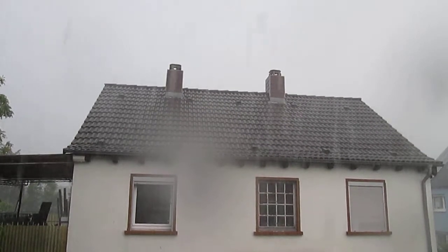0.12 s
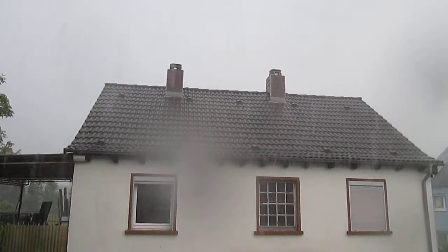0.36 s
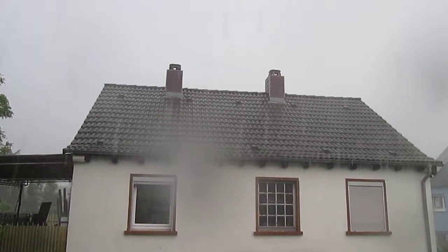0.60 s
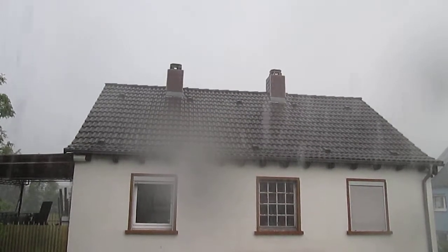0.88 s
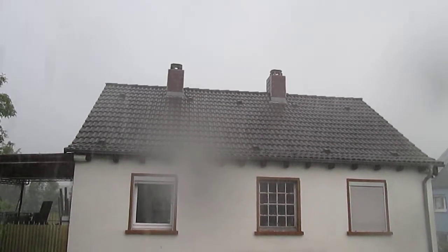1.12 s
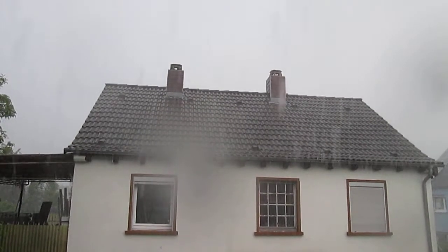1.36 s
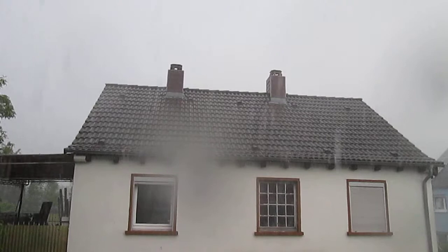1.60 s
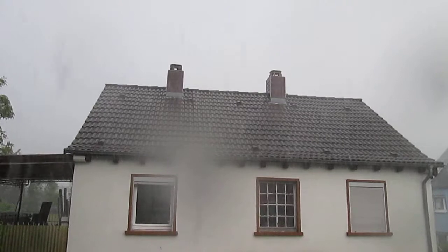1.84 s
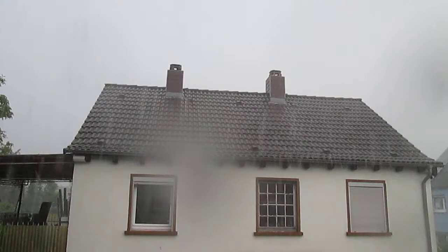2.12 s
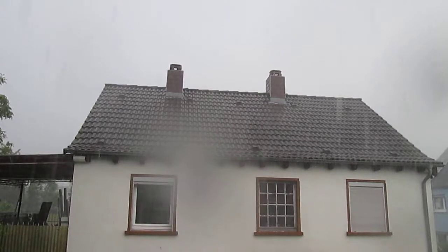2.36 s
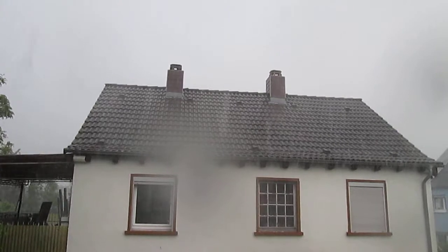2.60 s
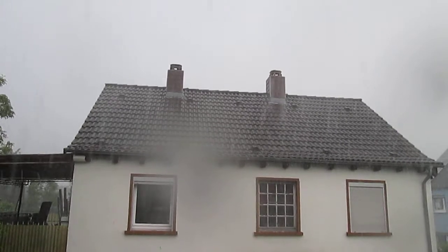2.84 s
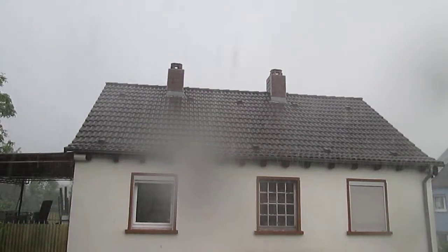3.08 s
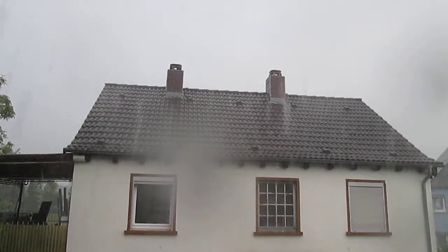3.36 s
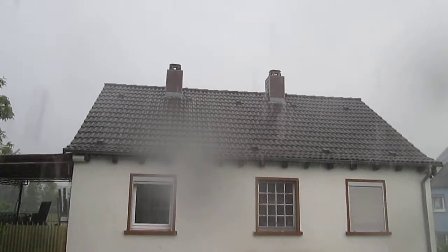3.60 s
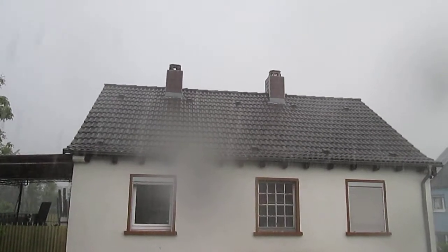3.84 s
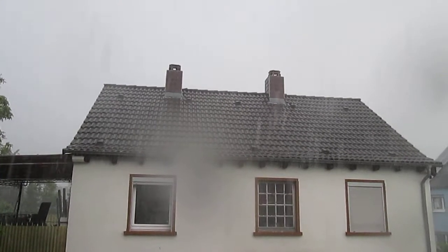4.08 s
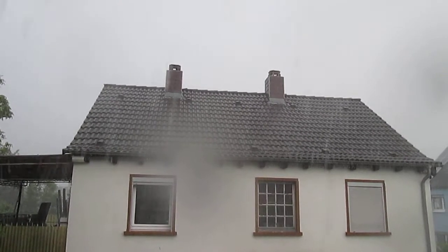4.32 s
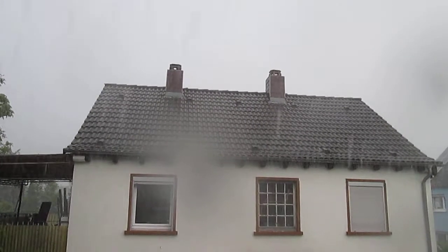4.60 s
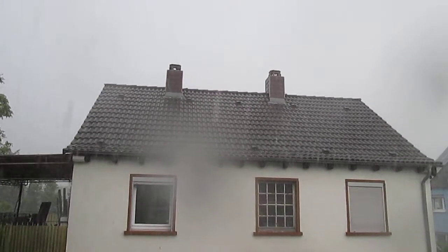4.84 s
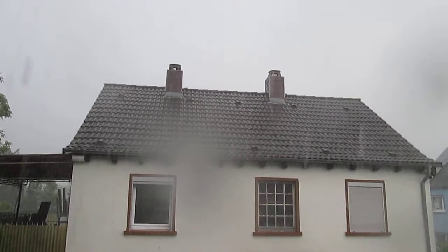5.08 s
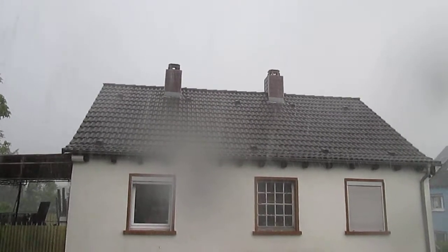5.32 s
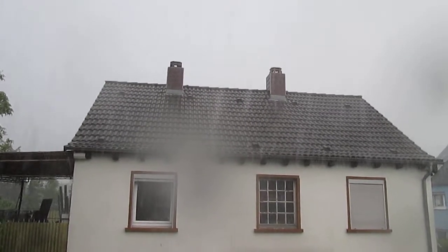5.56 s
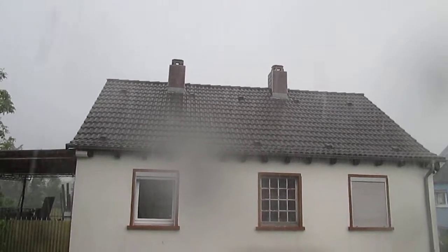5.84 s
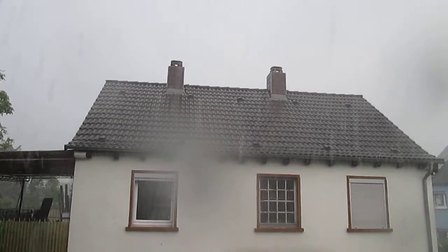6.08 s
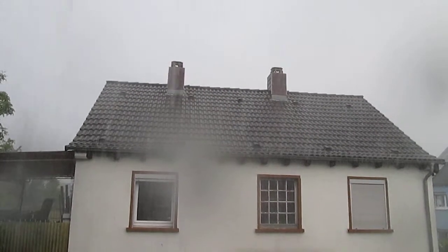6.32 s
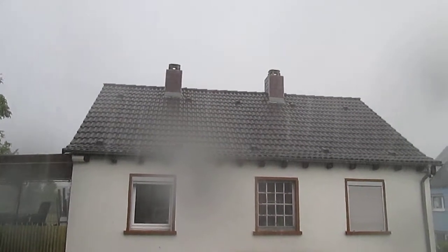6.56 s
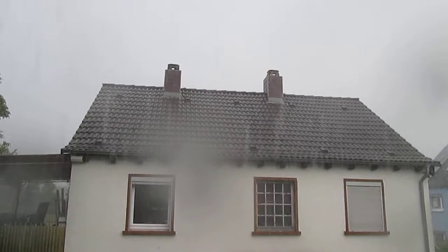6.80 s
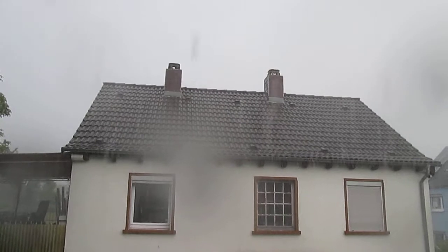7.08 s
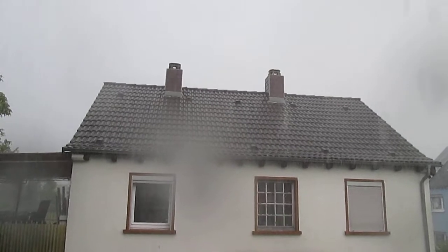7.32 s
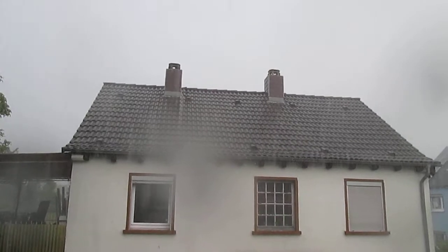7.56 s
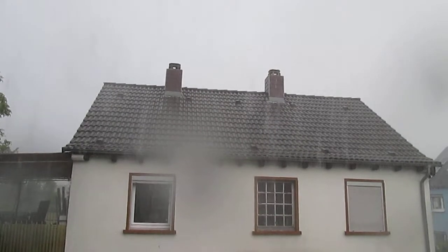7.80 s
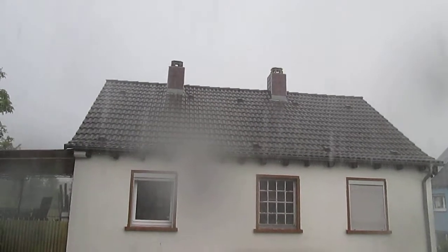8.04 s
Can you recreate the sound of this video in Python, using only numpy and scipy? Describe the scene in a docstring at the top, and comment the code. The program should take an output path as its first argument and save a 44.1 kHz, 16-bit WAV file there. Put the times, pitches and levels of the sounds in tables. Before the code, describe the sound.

Dense continuous rain heard from a window, a bright even hiss flecked with crisp clicks of big drops on the sill and tiny puddle plops.

```python
"""A dense hiss of far rain and the patter of near rain: a downpour on tiled roofs and paving.
It is heard from a window by a small camera with two close microphone ports; the rain is coloured noise and ticks.
Run-off splats into puddles as clusters of bubbles, a few bubbles ping, and spray puffs as short bright noise.
Single big drops crack on the sill as brief damped sines and make the gain control duck.
Gusts rumble and thump at the microphone now and then; a faint low hum of narrow noise wavers."""
import sys
import numpy as np
from scipy import signal
from scipy.fft import rfft, irfft, next_fast_len
from scipy.io import wavfile
from scipy.ndimage import uniform_filter1d, minimum_filter1d, map_coordinates

SR = 44100
rng = np.random.default_rng(int(sys.argv[2]) if len(sys.argv) > 2 else 0)


def nominal_scale(level):
    """Amplitude ratio for a level in decibels (scalar or array-like)."""
    x = np.asarray(level, float) / 20
    return 10 ** x


def dump(signal):
    """Clip the signal to [-1, 1] and save it as 16-bit WAV at the path in sys.argv[1]."""
    limited = np.clip(np.atleast_2d(signal).T, -1, 1)
    pcm = np.round(limited * 32767).astype(np.int16)
    wavfile.write(sys.argv[1], SR, pcm)


N = 360738  # length [samples]

# the biggest drops on the sill: (time [s], starting level of the damped sine [dB])
SILL_DROPS = [(0.0602, -8), (0.2614, -8.5), (0.5363, -6), (0.558, -8), (0.9825, -3), (1.1017, -9.5),
              (1.3958, -8), (2.247, -6), (2.9227, -4.5), (3.1339, -5), (4.332, -6), (4.4747, -8),
              (4.8237, -8), (5.3954, -8), (5.5356, -6.5), (5.6312, -6), (5.7328, -7.5), (5.8414, -8),
              (5.9827, -6.5), (6.2308, -4.5), (7.4366, -7), (7.6546, -7.5)]
# the strongest puffs of fine spray close to the microphone: (time [s], starting level before colouring [dB])
SPRAY_PUFFS = [(3.326, -17.5), (4.204, -14), (5.199, -20), (5.392, -16), (5.572, -19), (6.23, -11),
               (6.871, -18), (7.083, -16.5), (7.366, -17.5), (7.9, -19)]
# the loudest gobs of run-off splatting into puddles:
# (time [s], starting level of one bubble before the bass cut [dB], centre pitch [Hz])
PUDDLE_SPLATS = [(0.493, -40, 1090), (0.785, -38, 1400), (0.893, -42, 2100), (1.739, -39.5, 1140),
                 (1.779, -36, 1430), (2.314, -37, 2310), (2.557, -42, 2180), (3.714, -40, 1240),
                 (4.371, -32.5, 2370), (4.432, -42.5, 700), (4.658, -42, 1560), (5.688, -30, 2500),
                 (5.831, -37, 1600), (7.954, -37, 1510)]
# tiny bubbles that ping high and clear: (time [s], starting level [dB], starting pitch [Hz])
BUBBLE_PINGS = [(1.2331, -21, 7240), (5.9704, -25, 7330), (6.0811, -19, 8000), (8.0925, -14, 8410)]
# rumble of the wind on the ports: (time [s], level [dB])
WIND_LEVEL = [(0.0, -57), (0.2, -64), (1.07, -61), (1.59, -50.5), (1.8, -52), (2.1, -58), (2.3, -64),
              (3.12, -62), (3.28, -58), (3.4, -61), (4.15, -59), (4.35, -66), (6.06, -66), (6.13, -51),
              (6.5, -62), (6.72, -58), (7.2, -59), (8.18, -58)]
# the strongest gust pushes: (time [s], starting level [dB], starting pitch [Hz])
GUST_THUMPS = [(1.475, -42, 120), (1.608, -32, 149), (1.653, -33, 112), (1.738, -31, 136),
               (1.85, -30.5, 171), (2.025, -41, 120), (2.09, -42, 80), (3.244, -42, 120), (3.27, -36, 150),
               (3.643, -38, 160), (3.78, -43, 60), (4.153, -44, 110), (6.134, -35.5, 88), (6.148, -30, 230),
               (6.169, -29.5, 143), (6.316, -34, 190)]
# colour of rain on wet tiles and paving: (frequency [Hz], relative level [dB])
RAIN_COLOUR = [(30, -49), (60, -22), (110, -22.5), (165, -20.5), (260, -18), (350, -12), (470, -8.5),
               (560, -11.5), (1000, -8), (1500, -9), (2100, -5.5), (3200, -3.5), (4700, 0.5), (8000, -4),
               (15000, -11)]
# colour of the wind's rumble: (frequency [Hz], relative level [dB])
WIND_COLOUR = [(20, -17), (60, -5), (150, 4), (300, -5.5), (600, -19), (1200, -65)]
# what differs between the ports, against what they share: (frequency [Hz], gain [dB])
PORT_DIFFERENCE = [(1200, -69), (2200, -43), (3000, -29.5), (4500, -21), (7000, -18.5), (9000, -16),
                   (11500, -29), (14500, 6)]
# the camera's treble roll-off: (frequency [Hz], gain [dB])
CAMERA_TREBLE = [(5000, 6), (5800, 4.5), (7000, -3), (9000, -12), (11500, -23.5), (14000, -39),
                 (15000, -39), (16000, -36)]


def unit(x):
    """Scaled to rms 1."""
    return x / np.sqrt(np.mean(x ** 2) + 1e-20)


def curve(rows):
    """One value per sample from (time [s], value) rows."""
    return np.interp(np.arange(N) / SR, *np.transpose(rows))


def wobble(rate):
    """A smooth random curve with rate knots a second."""
    knots = rng.standard_normal(int(N * rate / SR) + 4)
    return map_coordinates(knots, [np.arange(N) * rate / SR])


def coloured(x, spectrum):
    """x through the causal (minimum-phase) filter of (frequency [Hz], gain [dB]) points."""
    size = 2 * next_fast_len(N // 2 + 4096)
    hz, db = np.transpose(spectrum)
    bins = np.fft.rfftfreq(size, 1 / SR)
    gain_db = np.interp(np.log(bins + 1), np.log(hz + 1), db)
    # folding the cepstrum onto positive time makes the filter minimum-phase
    cepstrum = irfft(np.log(nominal_scale(gain_db)), size)
    cepstrum[1:size // 2] *= 2
    cepstrum[size // 2 + 1:] = 0
    return irfft(rfft(x, size) * np.exp(rfft(cepstrum)), size)[..., :N]


def grains(s, hz, db, cycles, rise, length):
    """Damped sines that decay by 1/e in the given cycles of the starting pitch; rise makes the pitch climb."""
    t = np.arange(int(length * SR)) / SR
    turns = np.outer(hz, t)
    decay = np.exp(-turns / cycles)
    tone = np.sin(2 * np.pi * turns * (1 + rise * turns / cycles))
    wave = nominal_scale(db)[:, None] * decay * tone
    at = np.round(np.asarray(s) * SR).astype(int)[:, None] + np.arange(len(t))
    return np.bincount(at.ravel(), wave.ravel(), N + SR)[:N]


def at_random(count, db, scatter_db, hz=1, spread=0):
    """Rows (time [s], level [dB], pitch [Hz]) at chance moments, scattered about the usual level and pitch."""
    when = rng.random(count)
    size, pitch = rng.standard_normal((count, 2)).T
    return np.transpose([when * N / SR, db + scatter_db * size, hz * np.exp(spread * pitch)])


def hum():
    """Noise in one narrow resonance, perhaps the downpipe, swelling and fading."""
    centre_hz, width_hz = 166, 25
    level_db, swing_db = -67, 4
    resonance = [(centre_hz - 2 * width_hz, -40), (centre_hz, 0), (centre_hz + 2 * width_hz, -40), (2000, -90)]
    tone = unit(coloured(rng.standard_normal(N), resonance))
    return nominal_scale(level_db + swing_db * wobble(3)) * tone


def wind():
    """Eddies at the ports: a low rumble in lumps, and single pushes on the membrane."""
    lumps = nominal_scale(4.9 * wobble(25))
    rumble = nominal_scale(curve(WIND_LEVEL)) * unit(lumps * coloured(rng.standard_normal(N), WIND_COLOUR))
    # weak pushes grow with the wind; here db is their level over it
    weak = at_random(count=30, db=7.5, scatter_db=2, hz=127, spread=0.34)
    weak[:, 1] += np.interp(weak[:, 0], *np.transpose(WIND_LEVEL))
    s, db, hz = np.vstack([GUST_THUMPS, weak]).T
    push = grains(s, hz, db, cycles=0.91, rise=0.12, length=.06)
    # the membrane's quicker rebound
    flutter = grains(s + 0.00366, 2.05 * hz, db - 4, cycles=1.3, rise=0.07, length=.06)
    return rumble + push + flutter


def pings():
    """A drop in still water traps one bubble that rings for many cycles."""
    s, db, hz = np.transpose(BUBBLE_PINGS)
    return grains(s, hz, db, cycles=25, rise=0.0088, length=.02)


def drips(count, spread, width):
    """Run-off falls in gobs; each breaks into a cluster of small bubbles around its centre pitch."""
    small_gobs = at_random(count=22, db=-44, scatter_db=1.5, hz=1800, spread=0.194)
    gobs = np.vstack([PUDDLE_SPLATS, small_gobs])
    s, db, hz = np.repeat(gobs, count, axis=0).T  # count bubbles to a gob
    late, pitch = rng.standard_normal((len(s), 2)).T
    bubble_s = s + spread * np.abs(late)
    bubble_hz = hz * np.exp(width * pitch)
    bubbles = grains(bubble_s, bubble_hz, db, cycles=3.1, rise=0.048, length=.02)
    return coloured(bubbles, [(100, -21), (400, 0.5)])  # the splats carry no bass below about 400 Hz


def spray(t60):
    """Short bright puffs of droplets: noise bursts that fall by 60 dB in t60 seconds."""
    out = np.zeros(N + SR)
    t = np.arange(SR // 50) / SR
    faint = at_random(count=18, db=-20, scatter_db=3)[:, :2]
    for s, db in np.vstack([SPRAY_PUFFS, faint]):
        puff = nominal_scale(db - 60 * t / t60) * rng.standard_normal(len(t))
        out[round(s * SR):][:len(t)] += puff
    return coloured(out[:N], [(6000, -37), (10000, 5.5), (14000, 3.0), (17000, -50.0)])


def sill_drops():
    """A big drop on a hard sill is a thin crack of a few cycles."""
    ordinary = at_random(count=36, db=-11, scatter_db=1.5)[:, :2]
    s, db = np.vstack([SILL_DROPS, ordinary]).T
    return grains(s, np.full(len(s), 12500.), db, cycles=1.8, rise=0, length=.003)


def patter(count, spread_db):
    """Nearer drops, each a sharp tick of either sign; few are large."""
    when, size, sign = rng.random((count, 3)).T
    ticks = np.sign(sign - .5) * nominal_scale(-spread_db * np.log(size))
    return np.bincount((when * N).astype(int), ticks, N)


def far_rain(patchy_db):
    """Countless drops merge to a hiss whose loudness drifts in patches of time and pitch."""
    z = signal.stft(rng.standard_normal(N), nperseg=512)[2]
    field = uniform_filter1d(rng.standard_normal(z.shape), size=8, axis=0)
    field = uniform_filter1d(field, size=10, axis=1)
    return signal.istft(z * nominal_scale(patchy_db * unit(field)), nperseg=512)[1][:N]


def rain():
    """Hiss and patter share the colour of wet tiles and paving; rain from the sides reaches the ports unequally."""
    level_db = -25.5  # of what the ports share
    mix = unit(far_rain(patchy_db=0.62)) + nominal_scale(-17.0) * unit(patter(count=6000, spread_db=2.7))
    mid = coloured(mix, RAIN_COLOUR)
    side = coloured(coloured(unit(far_rain(patchy_db=1.7)), RAIN_COLOUR), PORT_DIFFERENCE)
    return nominal_scale(level_db) * np.array([mid + side, mid - side]) / np.std(mid)


def scene():
    """Only the rain differs between the ports; all other sounds reach both alike."""
    puddles = drips(count=26, spread=.008, width=0.26) + pings()
    drops = spray(t60=0.016) + sill_drops()
    return hum() + wind() + puddles + drops + rain()


def gain_control(x, ceiling_db, attack, hold, release):
    """Gain falls quickly by what a peak exceeds the ceiling, holds, then recovers exponentially in dB."""
    peak_db = 20 * np.log10(np.abs(x).max(axis=0) + 1e-9)
    over = np.maximum(peak_db - ceiling_db, 1e-6)
    span = 2 * int(hold * SR / 2) + 1
    held = -minimum_filter1d(-over, span, origin=span // 2)
    leak = np.arange(N) / SR / release
    duck_db = np.exp(np.maximum.accumulate(np.log(held) + leak) - leak)
    lag = 2 * int(attack * SR / 2) + 1  # the very front of a crack slips through
    return x * nominal_scale(-uniform_filter1d(duck_db, lag, origin=lag // 2))


def top_cut(x):
    """Nothing passes above the cut-off."""
    return signal.sosfilt(signal.butter(12, 15620, fs=SR, output="sos"), x)


def record(dry):
    """The camera: gain control, treble roll-off, each channel's own circuit hiss and a small constant offset."""
    ducked = gain_control(dry, ceiling_db=-11.5, attack=0.00023, hold=0.013, release=0.033)
    circuit = nominal_scale(-66) * coloured(rng.standard_normal(dry.shape), [(9000, -40.5), (13500, 2.5)])
    offset = -.0078  # of full scale
    mix = coloured(ducked, CAMERA_TREBLE) + circuit + offset
    return top_cut(mix)


dry = scene()
out = record(dry)
dump(out)
```